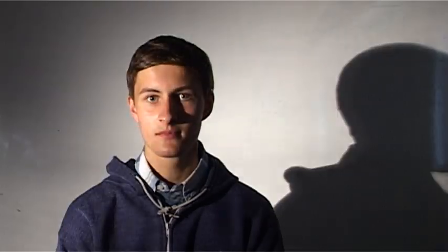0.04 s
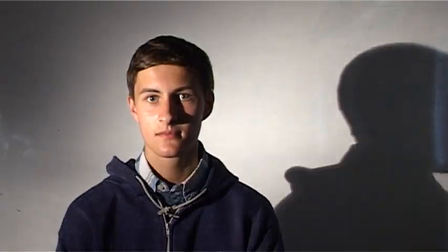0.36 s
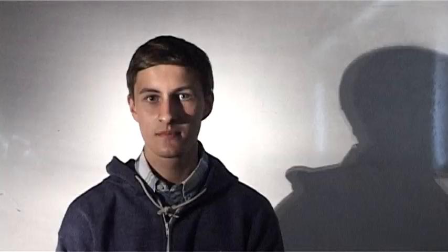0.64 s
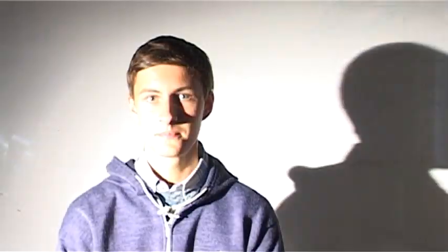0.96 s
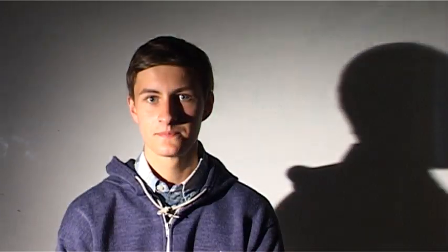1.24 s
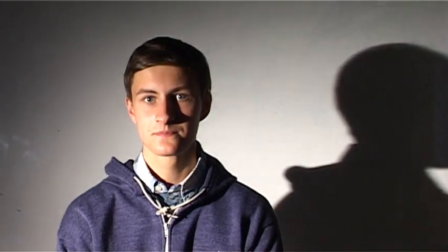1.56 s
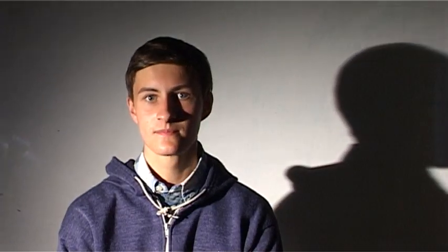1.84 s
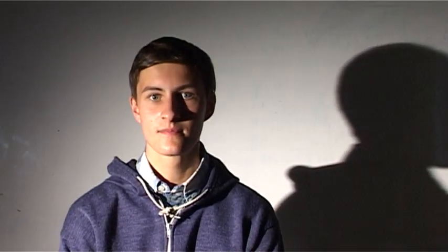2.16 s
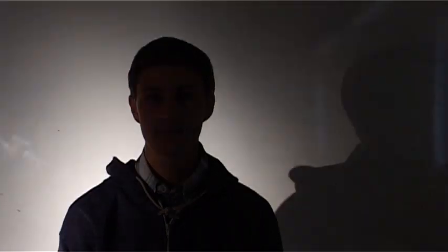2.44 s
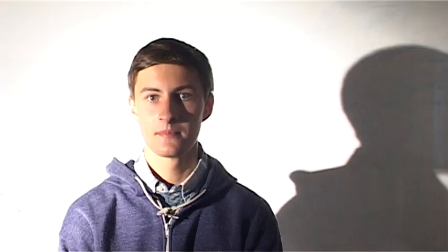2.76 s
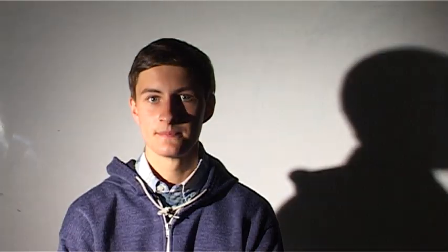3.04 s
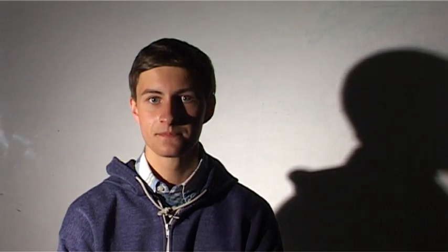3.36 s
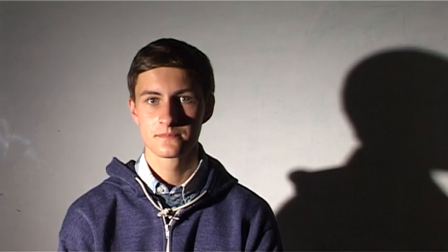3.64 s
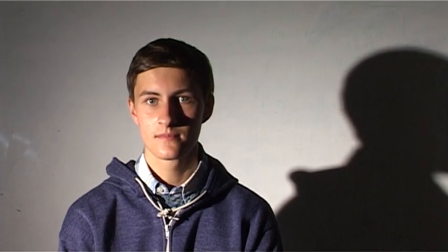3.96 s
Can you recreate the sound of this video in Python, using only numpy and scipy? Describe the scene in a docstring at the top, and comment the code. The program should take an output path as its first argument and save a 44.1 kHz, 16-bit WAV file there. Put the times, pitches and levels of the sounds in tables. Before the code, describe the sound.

A bad cable contact crackles, pops and thumps on the right over faint hiss.

```python
"""Inside a microphone lead, where no room sound gets through: a bad contact crackles on the right.
The voltage flips between levels: single jumps thump, short dropouts pop, and the contact spits,
chatters and bounces over a bed of sputter and fizz. The input's coupling stages pull every jump back
to zero. The left channel carries only faint hiss and mains hum."""
import sys
import numpy as np
from scipy import signal
from scipy.fft import rfft, irfft, next_fast_len
from scipy.io import wavfile
from scipy.ndimage import uniform_filter1d, map_coordinates

SR = 44100
rng = np.random.default_rng(int(sys.argv[2]) if len(sys.argv) > 2 else 0)


def waveform_to_disk(signal):
    """Save audio, clipped to [-1, 1], as 16-bit WAV at the path in sys.argv[1]."""
    frames = np.transpose(np.atleast_2d(signal))
    scaled = np.clip(frames, -1, 1) * 32767
    samples = np.round(scaled).astype(np.int16)
    wavfile.write(sys.argv[1], SR, samples)


N = 176400

# mains hum partials: (frequency [Hz], level [dB])
HUM_PARTIALS = [(50, -86), (100, -89), (200, -97), (250, -99), (300, -93)]
# fader rides for the coarse sputter and the fine fizz, three stretches each: (time [s], relative level [dB])
SPUTTER_RIDE = [
    [(0.0, -50.5), (0.12, -47), (0.368, -50.5), (0.808, -47), (1.246, -51), (1.368, -59), (1.56, -50)],
    [(1.575, -63.5), (1.677, -58), (1.9, -61), (2.155, -60), (2.517, -61), (2.58, -59.5)],
    [(2.63, -52.5), (2.866, -55), (3.522, -50.5), (3.644, -47), (3.754, -49), (3.85, -59), (3.904, -59),
     (4.0, -60)],
]
FIZZ_RIDE = [
    [(0.0, -49), (0.172, -51), (0.468, -52.5), (1.02, -55.5), (1.402, -53), (1.56, -55)],
    [(1.575, -61), (1.787, -63.5), (2.145, -61.5), (2.523, -60.5), (2.58, -63)],
    [(2.63, -55.5), (2.77, -54), (2.938, -56.5), (3.152, -54.5), (3.892, -52.5), (4.0, -61.5)],
]
# tiny contact points in the bed: (mean time open [s], mean time closed [s], relative level [dB])
SPUTTER_POINTS = [(.0005, .004, 0), (.003, .007, -7), (.00025, .002, -11), (.02, .03, -2.5)]
FIZZ_POINTS = [(.00008, .001, 8), (.00004, 0.00049, 0)]
# sharp spikes with a fluttering tail: (time [s], flutter decay [s], signed height [full scale])
SPIT_CUES = [(0.024, 0.00027, 0.18), (0.1415, 0.0011, 0.072), (1.6845, 0.0024, 0.022),
             (2.428, 0.0011, 0.044), (2.5611, 0.00025, -0.042), (2.5702, 0.00043, 0.093),
             (2.5752, 0.00014, 0.064), (2.73, 0.00031, 0.19), (2.7356, 0.0002, 0.24),
             (2.7576, 0.00025, 0.089), (2.7635, 0.0008, 0.15), (2.811, 0.00046, 0.18),
             (2.8615, 0.00065, 0.14), (2.9273, 0.0005, 0.088), (3.0359, 0.00038, 0.26),
             (3.0454, 0.00066, 0.089), (3.3635, 0.0004, 0.12), (3.987, 0.00014, 0.24),
             (3.9882, 0.0033, 0.11), (3.995, 0.00079, 0.23), (3.9984, 0.00051, 0.046)]
# the contact opens and closes again: (time [s], length [s], signed height [full scale])
POP_CUES = [(0.0263, 0.0032, -0.068), (0.72, 0.011, -0.048), (1.13, 0.027, 0.028), (1.197, 0.0014, -0.068),
            (1.559, 0.0013, -0.038), (1.666, 0.0086, -0.025), (1.6815, 0.00014, 0.06),
            (1.7003, .0009, -0.024), (2.4233, 0.0034, -0.046), (2.4548, .0027, -0.058),
            (2.509, 0.00058, -0.078), (2.5485, 0.00016, -0.066), (2.573, 0.0021, -.028),
            (2.5958, 0.0037, -0.55), (2.6169, 0.0045, -0.57), (2.7241, 0.000036, 0.24),
            (2.7268, 0.0014, 0.22), (2.7563, 0.0015, -0.1), (2.7631, 0.000043, 0.34),
            (2.7636, 0.0027, 0.049), (2.824, 0.0024, 0.067), (2.8387, 0.00518, 0.15),
            (2.8722, 0.00035, 0.13), (2.881, 0.00011, 0.13), (2.8966, 0.00024, 0.11),
            (2.9207, 0.00043, .135), (2.9246, .00012, 0.46), (2.942, 0.00059, 0.16), (2.947, 0.0016, 0.54),
            (2.9527, .0002, .15), (2.966, 0.00035, 0.17), (2.9868, 0.0049, 0.15), (3.0235, 0.000068, 0.15),
            (3.0459, 0.00014, 0.52), (3.0522, .00009, 0.32), (3.0876, 0.00065, 0.14),
            (3.1346, 0.00013, .16), (3.1514, 0.00013, 0.18), (3.1684, 0.0012, 0.21), (3.228, 0.0073, -.14),
            (3.296, 0.0017, 0.16), (3.5113, 0.00014, .13), (3.528, 0.00021, .12), (3.541, 0.00035, 0.12),
            (3.5449, 0.00062, 0.11), (3.55, 0.00032, 0.13), (3.5565, 0.0005, 0.2), (3.5584, 0.0074, .11),
            (3.5966, 0.000079, 0.11), (3.6165, 0.000096, 0.2), (3.6306, 0.00018, 0.13),
            (3.6416, 0.0001, 0.17), (3.6796, 0.001, 0.15), (3.6982, 0.00029, 0.13), (3.7021, .00007, 0.12),
            (3.7167, 0.0021, 0.14), (3.728, 0.00018, 0.17), (3.7342, 0.00032, .17), (3.8197, 0.0018, 0.11),
            (3.914, .0002, -0.18)]
# the contact rattles: (time [s], length [s], mean stay [s], signed height [full scale])
CHATTER_CUES = [(0.032, 0.041, 0.0005, 0.055), (0.287, 0.049, 0.000064, 0.021),
                (0.305, 0.011, 0.00035, -0.049), (.848, 0.084, 0.0005, 0.013),
                (1.093, 0.036, 0.00094, 0.019), (2.715, 0.055, 0.00026, -0.017),
                (3.832, .0145, 0.00045, .13), (3.854, 0.021, 0.00046, -0.13), (3.922, 0.064, .00052, 0.14),
                (3.987, 0.013, 0.000049, 0.13)]
# the voltage jumps and stays: (time [s], signed height [full scale])
THUMP_CUES = [(0.067, 0.088), (0.2834, 0.072), (0.3369, 0.15), (1.2075, -0.53), (1.2648, 0.057),
              (1.5207, 0.55), (2.6238, -0.51), (3.19, 0.17), (3.262, -0.14), (3.31, .13), (3.3143, 0.1),
              (3.325, -0.11), (3.3599, -.12), (3.3931, 0.13), (3.4281, -0.14), (3.4417, 0.11),
              (3.482, -0.13)]
# the contact holds and the bed ducks: (time [s], length [s], gain [dB])
LULL_CUES = [(0.119, 0.019, -5.5), (0.346, 0.023, -8), (0.73, 0.037, -3), (0.797, 0.017, -9.5),
             (0.949, 0.034, -10.5), (1.061, 0.026, -5), (1.132, 0.06, -3.5)]
# the contact bounces: (time [s], length [s], bounce rate [Hz], signed height [full scale])
BOUNCE_CUES = [(2.5991, .0004, 3000, 0.47), (2.7133, .0005, 4280, 0.23), (2.8133, .0008, 8500, .2),
               (2.8254, .0007, 3750, 0.38), (2.9312, .0008, 8930, 0.48), (2.9682, .0005, 6000, 0.14),
               (3.025, .0005, 8530, 0.16)]
# tone of the input stage: (frequency [Hz], gain [dB])
INPUT_EQ = [(100, 0), (1000, -1), (3500, 0.5), (6000, -0.25), (8300, 1), (13000, 1), (16000, -5)]


def amp(db):
    """Decibels to linear gain."""
    return 10 ** (np.asarray(db) / 20)


def unit(x):
    """The signal at rms 1."""
    return x / np.sqrt(np.mean(x ** 2) + 1e-20)


def ride(stretches):
    """One smooth fader move in dB through the points of all stretches."""
    return np.interp(np.arange(N) / SR, *np.vstack(stretches).T)


def wobble(rate_hz):
    """A smooth random curve with rate_hz knots a second."""
    return map_coordinates(rng.standard_normal(N // 20), [np.arange(N) * rate_hz / SR], mode="mirror")


def add(track, start, x):
    """Mix x into the track at start, in seconds."""
    i = int(np.clip(round(start * SR), 0, N - 1))
    track[i:i + len(x)] += x[:N - i]


def gate(length_s):
    """A rectangle of height 1 with a fractional last sample."""
    width = max(length_s * SR, 1)
    return np.clip(width - np.arange(int(width) + 1), 0, 1)


def flicker(n, open_s, closed_s, cycles):
    """A contact flips between open (1) and closed (0) after random stays, rarely very short ones."""
    stays = rng.exponential(size=(cycles, 2, 2)).mean(axis=2) * [open_s, closed_s] * SR
    flips = np.r_[0, stays.cumsum()]
    time_open = np.r_[0, (stays * [1, 0]).cumsum()]
    return np.diff(np.interp(np.arange(n + 1), flips, time_open))  # share of each sample spent open


def idle_input():
    """The noise floor: low mains hum under faint hiss with a softened top."""
    hiss_db, corner_hz = -72, 12000
    t = np.arange(N) / SR
    hum = sum(amp(db) * np.sqrt(2) * np.sin(2 * np.pi * (hz * t + rng.random()))
              for hz, db in HUM_PARTIALS)
    white = amp(hiss_db) * rng.standard_normal(N)
    return hum + signal.lfilter(*signal.butter(1, corner_hz, fs=SR), white)


def contact_points(points, cycles):
    """Several tiny contacts flicker at once and blend into one gritty texture at rms 1."""
    grit = sum(amp(db) * flicker(N, open_s, closed_s, cycles) for open_s, closed_s, db in points)
    return unit(grit - grit.mean())


def bed():
    """Coarse sputter and fine fizz swell and ebb with the contact, wavering and stuttering together."""
    sputter_trim_db, fizz_trim_db = 10.5, 6
    waver, stutter = wobble(rate_hz=45), wobble(rate_hz=260)
    sputter_db = ride(SPUTTER_RIDE) + sputter_trim_db + 1.5 * waver + 2 * stutter
    fizz_db = ride(FIZZ_RIDE) + fizz_trim_db + 0.5 * waver + 1.64 * stutter
    sputter = contact_points(SPUTTER_POINTS, cycles=8000)
    fine_grit = contact_points(FIZZ_POINTS, cycles=40000)
    fizz = unit(fine_grit + 0.57 * rng.standard_normal(N))  # hiss fills in between the grains
    return sputter * amp(sputter_db) + fizz * amp(fizz_db)


def spits():
    """The contact lifts for an instant, then flutters as it settles: a hard tick with a fizzy tail."""
    spike_s, stay_s = 0.00008, 0.00007
    out, t = np.zeros(N), np.arange(SR // 100) / SR
    spike = gate(spike_s)
    for start, decay, height in SPIT_CUES:
        spit = flicker(len(t), stay_s, stay_s, cycles=300) * np.exp(-(t / decay) ** 2)
        spit[:len(spike)] = np.maximum(spit[:len(spike)], spike)
        add(out, start, height * spit)
    return out


def pops():
    """Each dropout is a square pulse of voltage: the short ones click, the longer ones have body."""
    out = np.zeros(N)
    for start, length, height in POP_CUES:
        add(out, start, height * gate(length))
    return out


def chatter():
    """The contact rattles between two levels in rasping runs, noisy whenever it is open."""
    roughness = 0.18
    out = np.zeros(N)
    for start, length, stay, height in CHATTER_CUES:
        n = int(length * SR)
        rasp = 1 + roughness * rng.standard_normal(N // 10)[:n]
        add(out, start, height * flicker(n, stay, stay, cycles=400) * rasp)
    return out


def thumps():
    """The voltage steps and stays; the input's coupling turns each step into a thump."""
    out = np.zeros(N)
    for start, height in THUMP_CUES:
        add(out, start, np.full(N, height))
    return out


def lulls():
    """A gain that ducks the bed abruptly while the contact holds."""
    edge_s = 0.0016
    duck_db = np.zeros(N)
    for start, length, db in LULL_CUES:
        add(duck_db, start, db * gate(length))
    return amp(uniform_filter1d(duck_db, int(edge_s * SR)))


def bounces():
    """The contact bounces in short, uneven runs: each crackle has its own bright pitch."""
    jitter, duty = 0.26, 0.43  # unevenness of the bounces, share of each spent in contact
    out = np.zeros(N)
    for start, length, rate_hz, height in BOUNCE_CUES:
        gaps, stays = np.exp(jitter * rng.standard_normal(size=(2, 24))) / rate_hz
        for delay, stay in zip(gaps.cumsum() - gaps[0], stays):
            if delay < length:
                add(out, start + delay, height * gate(duty * stay))
    return out


def coupling(x):
    """A coupling capacitor and a slightly resonant low cut: every jump swings back through zero."""
    coupling_hz, low_cut_hz, q = 9.5, 7, 1
    w = 2 * np.pi * low_cut_hz
    x = signal.lfilter(*signal.butter(1, coupling_hz, "high", fs=SR), x)
    return signal.lfilter(*signal.bilinear([1, 0, 0], [1, w / q, w * w], SR), x)


def scene():
    """The mix: the idle input hard left, the bad contact hard right."""
    left = idle_input()
    right = thumps() + pops() + spits() + bounces() + chatter() + bed() * lulls()
    return np.array([left, right])


def record(dry):
    """The input stage: its coupling, a gentle EQ and a steep cut at the very top."""
    top_hz = 16000
    padded = next_fast_len(N + SR // 2)
    hz = np.fft.rfftfreq(padded, 1 / SR)
    eq_hz, eq_db = np.transpose(INPUT_EQ)
    eq = amp(np.interp(np.log(hz + 1), np.log(eq_hz), eq_db))
    high_cut = 1 / np.sqrt(1 + (hz / top_hz) ** 120)
    return irfft(rfft(coupling(dry), padded) * eq * high_cut, padded)[:, :N]


dry = scene()
out = record(dry)
waveform_to_disk(out)
```